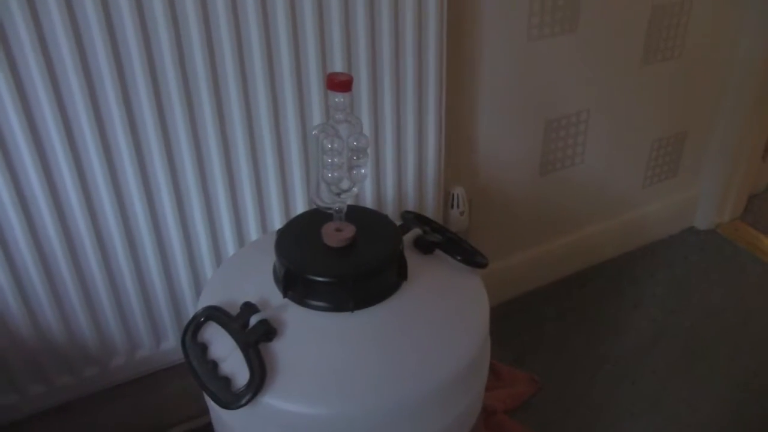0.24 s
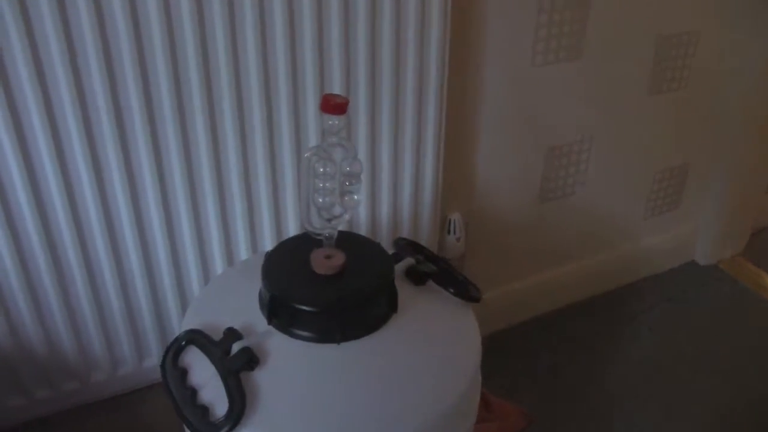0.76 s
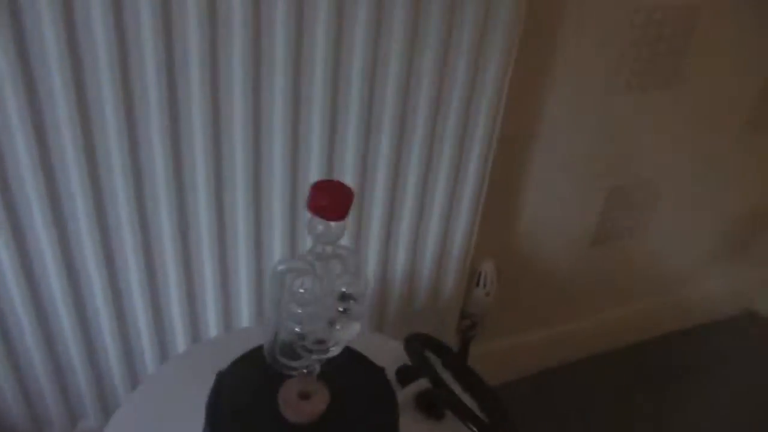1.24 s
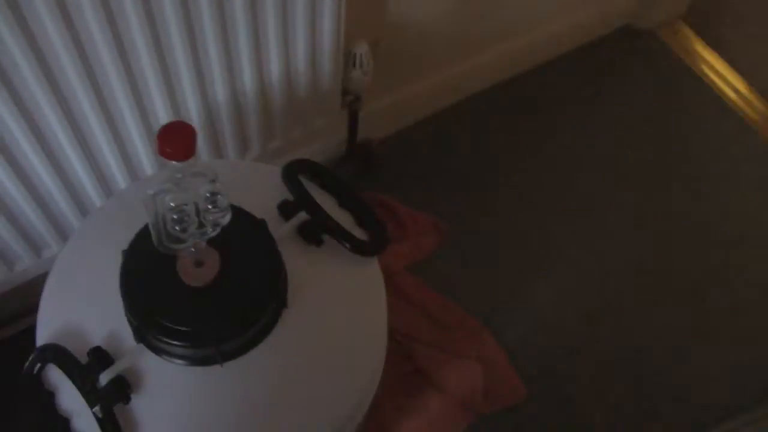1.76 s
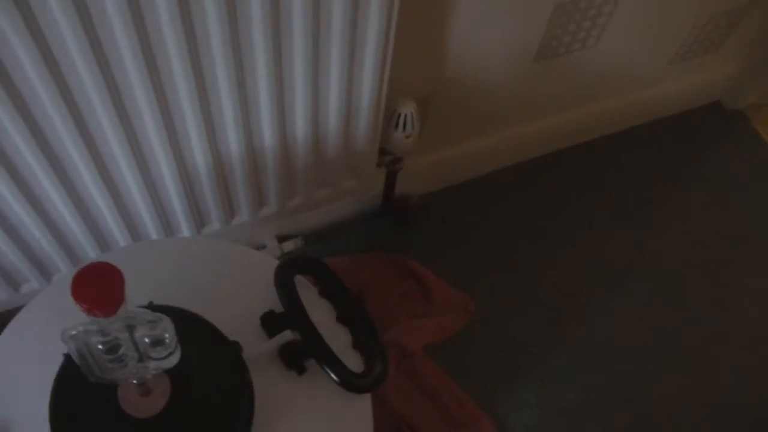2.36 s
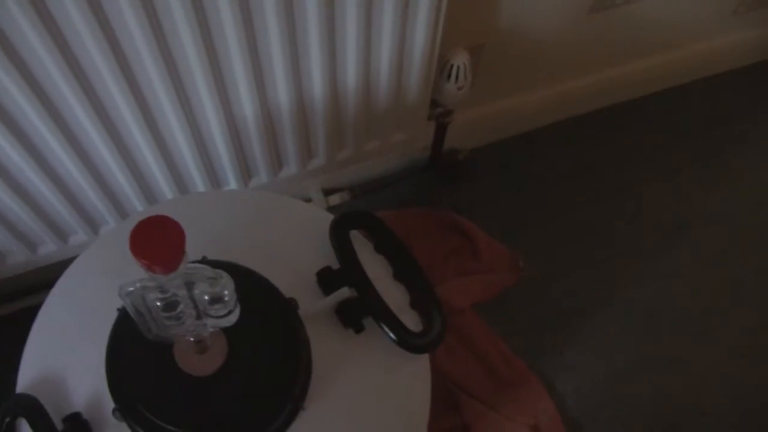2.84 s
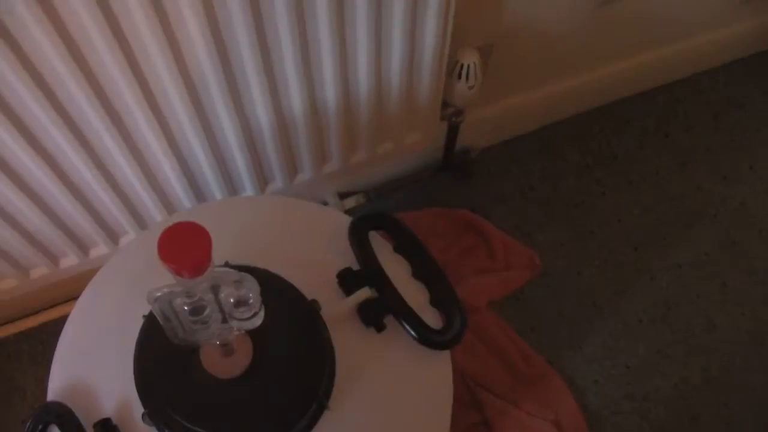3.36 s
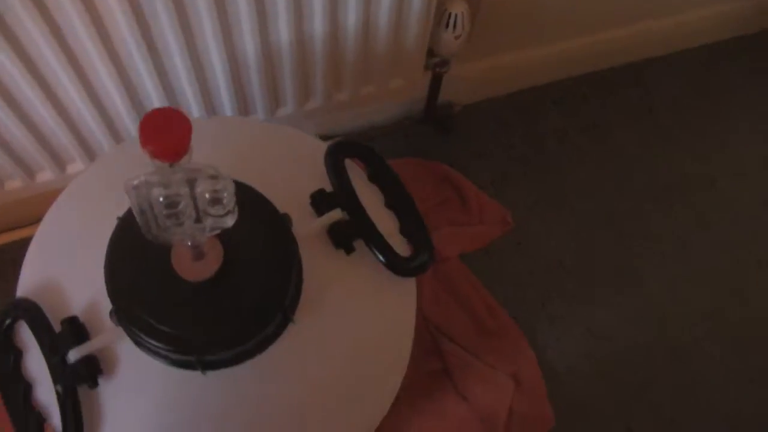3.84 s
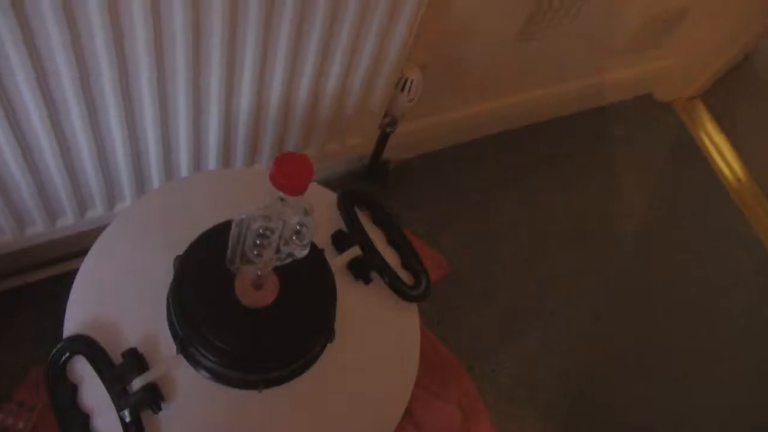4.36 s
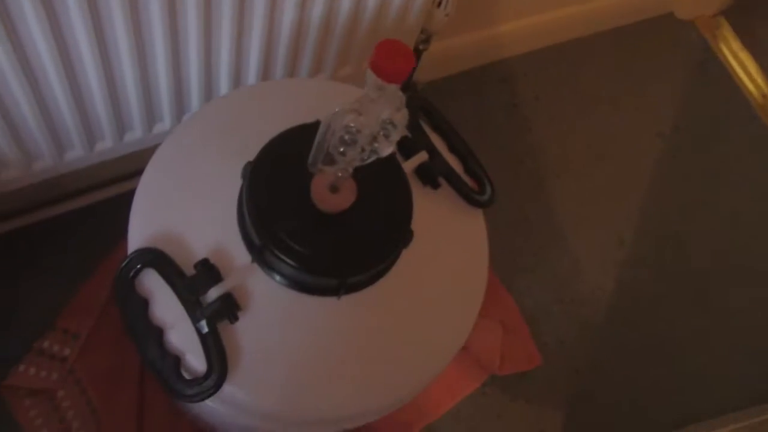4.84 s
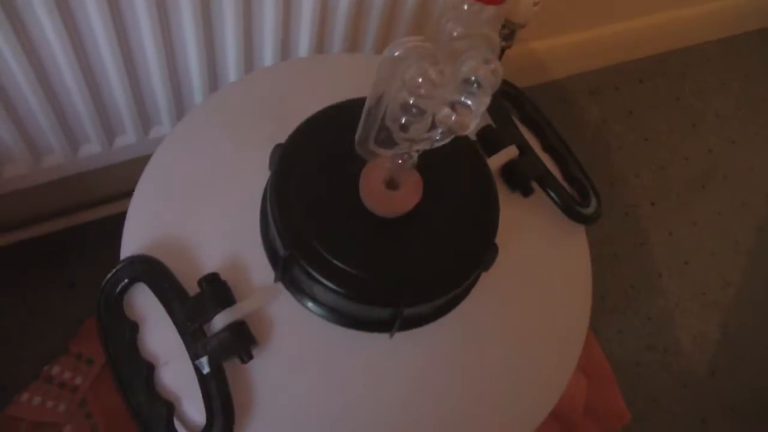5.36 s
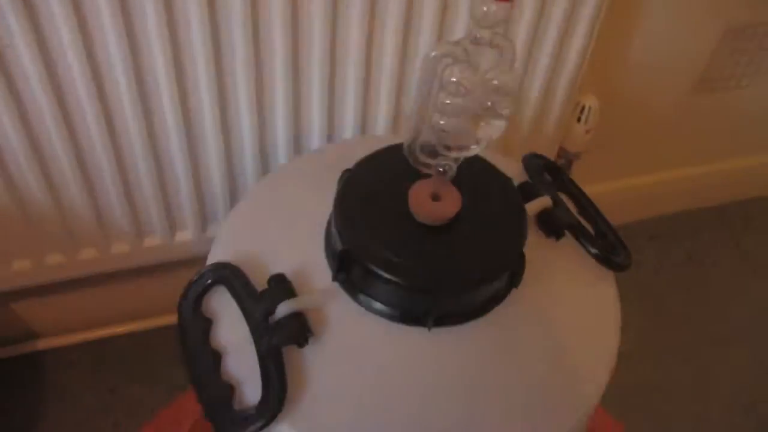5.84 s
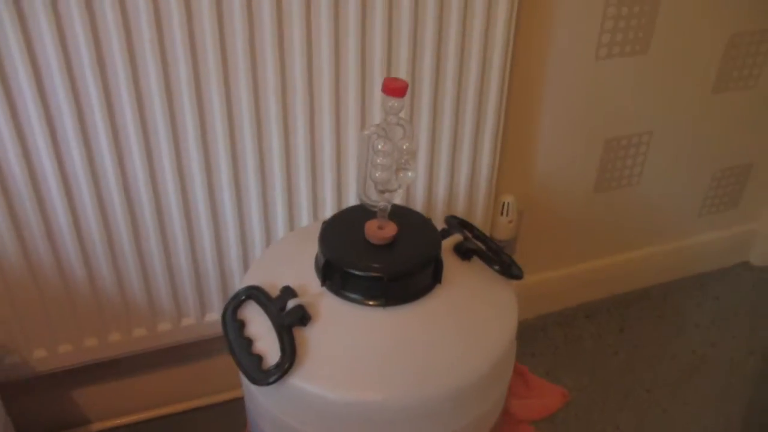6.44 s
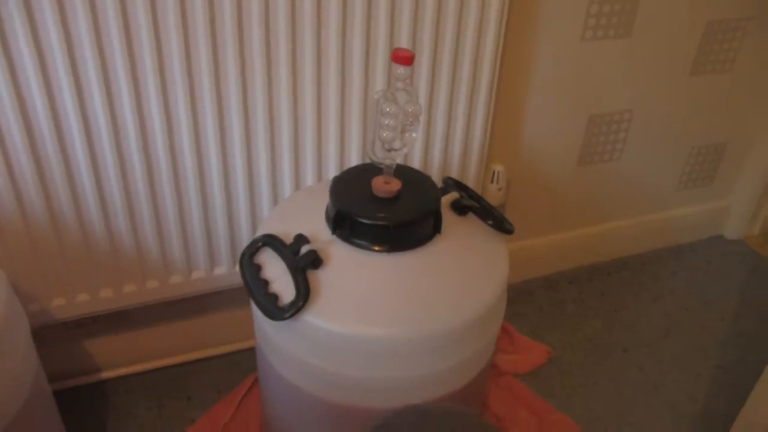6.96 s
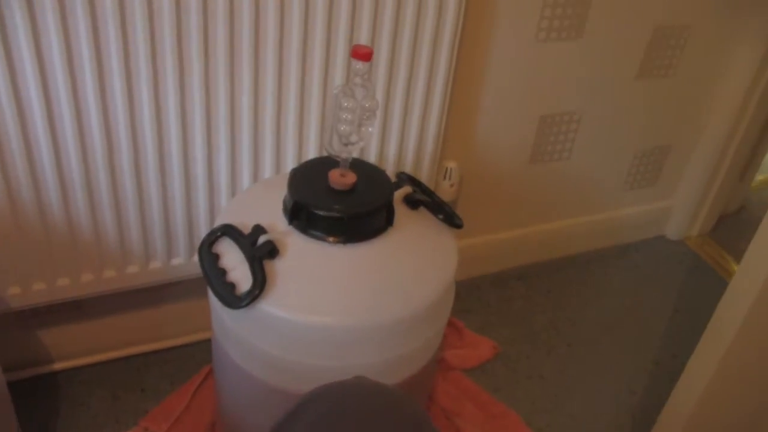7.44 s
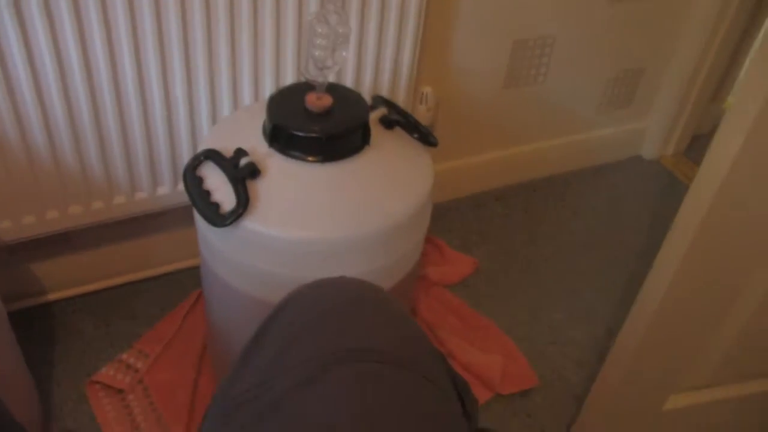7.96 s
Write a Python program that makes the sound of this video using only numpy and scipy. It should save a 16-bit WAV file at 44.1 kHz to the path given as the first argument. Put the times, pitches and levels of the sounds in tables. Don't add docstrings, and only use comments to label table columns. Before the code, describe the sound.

A quiet, small carpeted room with steady low air and soft microphone hiss, heard close in gentle stereo. From 0 to 2.3 s someone shifts nearby: cloth rubs, dry seam ticks, carpet crackle, a tiny high rubber squeak at 1.2 s, and a soft knee thud with hard clicks around 1.9 s. Movement sinks almost to stillness. At 3.3 s, after a barely audible warning click, a hollow plastic part lets go with a sharp, bright double-edged pop, by far the loudest sound, with quick echoes and a short room tail. Rustles, ticks and a low bump return at 3.9 to 4.9 s. At 5.4 to 5.65 s crisp clicks meet one brief airlock gurgle, bubbles ringing and climbing. Soft thuds follow at 5.7 s, then weight drags with dull stuttering creaks from 6.1 to 7.1 s, a knock at 7.35 s, and light rustling and faint creaks to the end, about 8 s.

```python
import sys
import numpy as np
from scipy import signal
from scipy.fft import rfft, irfft
from scipy.io import wavfile

SR = 44100
rng = np.random.default_rng(int(sys.argv[2]) if len(sys.argv) > 2 else 0)


def linear_from_db(decibels):
    return 10 ** (np.asarray(decibels, float) / 20)


def generate_wav(sig):
    pcm = np.round(np.clip(np.atleast_2d(sig).T, -1, 1) * 32767).astype(np.int16)
    wavfile.write(sys.argv[1], SR, pcm)


N = 361487
EDGES_HZ = 40 * 2 ** np.arange(0, 9, .5)


def rms_one(x):
    return x / np.sqrt(np.mean(x ** 2) + 1e-20)


def peak_one(x):
    return x / abs(x).max()


def at_hz(points, hz):
    points = np.array(sorted(points))
    return np.interp(np.log(hz), np.log(points[:, 0]), points[:, 1])


def drift(rate_hz):
    r = np.exp(-16 * np.pi * rate_hz / SR)
    slow = signal.lfilter([1], [1, -2 * r, r * r], rng.standard_normal(N // 8 + 4002))[4000:]
    return np.interp(np.arange(N) / 8, np.arange(len(slow)), rms_one(slow))


def band(x, low_hz, high_hz):
    sos = signal.butter(2, [low_hz, min(high_hz, .45 * SR)], "band", fs=SR, output="sos")
    return signal.sosfilt(sos, x)


def fading(t60_s, size):
    return linear_from_db(-60 * np.arange(size) / SR / max(t60_s, .002))


def ring(x, hz, t60_s):
    r = linear_from_db(-60 / (t60_s * SR))
    w = 2 * np.pi * hz / SR
    return signal.lfilter([0, np.sin(w)], [1, -2 * r * np.cos(w), r * r], x + 1e-18)


def add(out, start_s, x):
    i = round(start_s * SR)
    out[i:i + len(x)] += x[:N - i]


def room_tone():
    # frequency in Hz, density in dB per Hz.
    air = [(12, -36.5), (20, -5), (33, -27), (58, -16.5), (91, -14.5), (154, -22.5), (270, -21), (337, -24),
           (367, -22), (399, -23.5), (849, -33.5), (923, -30), (1190, -32.5), (3950, -34), (16000, -49)]
    # frequency in Hz, side minus mid in dB.
    air_side = [(60, -26), (110, -4.5), (200, 2), (380, 2), (700, 7), (1290, 3), (2380, -2), (4400, -5.5),
                (8120, 0), (15000, 2)]
    level_db = -68
    hz = np.maximum(np.arange(N // 2 + 1) * SR / N, 1)
    mid, side = rfft(rng.standard_normal((2, N))) * linear_from_db(at_hz(air, hz)) * (hz > 18)
    scale = linear_from_db(level_db) / np.std(irfft(mid, N))
    side = side * linear_from_db(at_hz(air_side, hz))
    return scale * irfft(np.array([mid + side, mid - side]), N)


def effort(t_s):
    # time in seconds, steady rustle in dB.
    restless = [(0.0, -65.5), (0.35, -68), (0.45, -70), (0.85, -65), (1.1, -63), (1.5, -62.5),
                (1.85, -62.5), (2.25, -68), (2.8, -70.5), (3.18, -72.5), (3.8, -71.5), (4.3, -67.5),
                (5.4, -65), (5.55, -61.5), (7.08, -61.5), (7.18, -67), (7.5, -68), (8.2, -73.5)]
    steady_db = [-10, 0, 0, -2.5]
    # peak time in seconds, level in dB, fading time in seconds, hiss over rub in dB.
    rubs = [(.038, -62, 0.022, -16), (.59, -59.5, 0.058, -4.5), (.66, -56, 0.081, -1.8),
            (.954, -61, 0.074, -2), (1.213, -57.5, 0.087, -2.5), (1.33, -59.5, 0.069, -12),
            (1.706, -62, 0.16, -3), (1.896, -49.5, 0.03, -4), (1.96, -62.5, 0.2, -1.5),
            (2.359, -65, .08, -3), (2.658, -68, .08, -5), (3.891, -60.5, 0.05, -4.5),
            (3.956, -56, 0.037, -6), (4.083, -57.5, 0.046, -5.5), (4.406, -61, 0.02, 2.5),
            (4.49, -60, 0.044, -2.5), (4.69, -65, 0.15, 2), (4.867, -62.5, 0.051, -8),
            (5.068, -65.5, 0.047, 1), (5.29, -75, 0.11, -3), (5.388, -56, 0.028, -3.5),
            (5.69, -62, 0.035, -13), (5.77, -59.5, 0.13, -1), (5.899, -58.5, 0.048, -8),
            (6.08, -62, 0.086, -25), (6.48, -65, 0.24, 4.5), (6.9, -62.5, 0.23, 4),
            (7.357, -65, 0.06, -1.5), (7.69, -66, 0.2, -2), (8.015, -60.5, 0.045, -5),
            (.79, -66.5, 0.075, 3.5), (7.6, -74, .08, -4), (7.93, -70, 0.13, 1)]
    # peak time in seconds, level in dB, fading time in seconds,
    # floor rumble over drag in dB.
    shifts = [(0.0, -63, 0.26, -8), (.3, -65, 0.15, -20), (.954, -52.5, 0.056, -17), (1.23, -58, 0.19, -12),
              (1.39, -68, 0.045, -4), (1.7, -61, 0.075, -29), (1.896, -50, 0.033, -16),
              (1.96, -55.5, 0.093, -16), (2.3, -66.5, 0.15, -3), (2.506, -73, 0.044, 6),
              (2.83, -83, .06, 7), (3.56, -69, 0.19, -13), (4.406, -53.5, 0.022, -30),
              (4.49, -67, 0.052, -25), (4.63, -81, 0.069, .5), (4.867, -59, 0.043, -1),
              (5.14, -69, 0.095, -16), (5.344, -65, 0.035, -18), (5.55, -53.5, 0.12, -7),
              (5.72, -53, 0.14, 0), (5.9, -59, 0.17, -22), (6.18, -50.5, 0.12, -33),
              (6.467, -55.5, 0.31, -11), (6.7, -57, 0.34, -6), (6.85, -58, 0.36, -19),
              (7.09, -56, 0.061, -13), (7.29, -60, 0.12, -11), (7.485, -64.5, 1, -10),
              (7.916, -60, 0.076, -9), (8.1, -67, 0.24, -3)]
    rise_share, fade_db, rounding = 0.79, 9.5, 1.5
    power = linear_from_db(2 * (np.interp(t_s, *np.transpose(restless)) + np.c_[steady_db]))
    moves = [(at, db, fade_s, [-31, -7, 0, hiss_db]) for at, db, fade_s, hiss_db in rubs]
    moves += [(at, db, fade_s, [rumble_db, 0, -20, -35]) for at, db, fade_s, rumble_db in shifts]
    for at, db, fade_s, colour_db in moves:
        away = np.where(t_s > at, t_s - at, (at - t_s) / rise_share) / fade_s
        power = power + linear_from_db(2 * (db - fade_db * away ** rounding + np.c_[colour_db]))
    return 10 * np.log10(power)


def moving(patchy_db, grain_db, side_db):
    moving_hz = [100, 520, 2400, 4300, 6100]
    # frequency in Hz, level in dB.
    cloth = [(40, -10.5), (70, -15.5), (150, -3), (210, -4.5), (300, -5.5), (430, -9), (760, -7.5),
             (1500, -5.5), (3000, -5), (4300, -7), (6000, -1.5), (8600, -5.5), (12000, -6), (15000, -7.5)]
    # frequency in Hz, flicker in dB.
    lumps = [(60, -1.5), (250, 2), (700, 2), (1500, 2), (8000, -0.96)]
    t_s = np.arange(0, N + 128, 128) / SR
    levels_db = effort(t_s)[[0, 1, 2, 2, 3]]
    white = rng.standard_normal((2, 2, N)) * linear_from_db(grain_db * drift(350))
    out, together = 0, drift(25.3)
    for k, (low_hz, high_hz) in enumerate(zip(EDGES_HZ, EDGES_HZ[1:])):
        hz = np.sqrt(low_hz * high_hz)
        shares = np.array([np.interp(np.log(hz), np.log(moving_hz), one) for one in np.eye(len(levels_db))])
        level_db = np.interp(np.arange(N) / SR, t_s, shares @ levels_db)
        flicker_db = patchy_db * min(hz / 600, 1) * together + at_hz(lumps, hz) * drift(21)
        noise = rms_one(band(white[k % 2], low_hz, high_hz))
        mid, side = noise * linear_from_db(level_db + at_hz(cloth, hz) + flicker_db)
        out = out + mid + linear_from_db(side_db) * side * [[1], [-1]]
    return out


def crackle():
    creaks_per_s, level_db, cycles = 160, -13, 4.5
    t_s = np.arange(0, N + 128, 128) / SR
    sizes = linear_from_db(3.9 * np.minimum(rng.exponential(1, N), 2.4)) * rng.choice([-1, 1], N)
    sizes = sizes * (rng.random(N) < creaks_per_s / SR)
    pitches_hz = np.geomspace(300, 2600, 14)
    dealt = rng.integers(0, 14, N)
    rings = sum(ring(sizes * (dealt == k), hz, cycles / hz) for k, hz in enumerate(pitches_hz))
    drag_db = np.interp(np.arange(N) / SR, t_s, effort(t_s)[1])
    return rms_one(rings) * linear_from_db(drag_db + level_db)


def squeak(partial_db):
    # time in seconds, pitch in Hz, level in dB.
    sole = [(1.18, 2900, -62), (1.192, 3000, -55), (1.202, 2880, -57), (1.207, 2940, -39.5),
            (1.218, 2970, -44.5), (1.222, 3050, -56), (1.232, 2990, -57), (1.244, 3000, -66)]
    t = np.arange(N) / SR
    s, hz, db = np.transpose(sole)
    phase = 2 * np.pi * np.cumsum(np.interp(t, s, hz) * (1 + 0.0323 * drift(270))) / SR
    level = linear_from_db(np.interp(t, s, db) + 1.7 * drift(120) + 2.0) * (t > s[0]) * (t < s[-1])
    return level * (np.sin(phase) + linear_from_db(partial_db) * np.sin(1.88 * phase) + linear_from_db(-16) * np.sin(4.7 * phase))


def ticks():
    # start in seconds, level in dB, brightness in dB, ring in Hz.
    casing = [(.023, -54, -2, 1100), (1.123, -50, 3, 2420), (1.18, -55, -1, 2920), (1.891, -46, 1, 930),
              (3.904, -52, -6, 1600), (4.061, -57, 4, 3690), (4.435, -50.5, -7, 1620),
              (4.467, -53.5, -8, 860), (4.518, -63, -11.5, 3340), (4.564, -52.5, -1, 4000),
              (5.533, -56, -2, 2000), (5.652, -56, 1.5, 1800), (5.690, -52, 4, 2190),
              (5.743, -48.5, -1, 1800), (7.042, -56, -6, 1300), (7.349, -50.5, -12, 3800)]
    seams = [(0.317, -57, 9.5, 1400), (.495, -58.5, -4, 920), (.574, -55, 7, 1690), (.934, -48.5, 4, 2150),
             (1.001, -49, 0.5, 1510), (1.334, -56.5, -12, 945), (1.787, -49, -2, 1190),
             (1.879, -45, 0, 1210), (1.982, -49, 0.5, 814), (2.207, -45, 1.5, 1880), (2.598, -56, 0, 900),
             (2.649, -54.5, -2.5, 1650), (3.882, -48.5, 2, 2140), (3.953, -41, 3, 1660),
             (4.009, -62, 6, 1400), (4.182, -59, 4, 2850), (4.334, -55.5, 4, 880),
             (4.863, -50.5, -5.5, 1270), (4.887, -65, 6, 1180), (5.382, -44.5, 7, 2060),
             (5.504, -45, 5.5, 5700), (5.547, -51, -4, 3120), (6.342, -48.5, -8, 790),
             (6.735, -51.5, -6.5, 790), (6.979, -48.5, -8, 665), (7.51, -66, -14.5, 816),
             (7.793, -55, -6.5, 1380)]
    boards = [(1.412, -50, 1, 764), (2.776, -55.5, 1.5, 1040), (2.897, -55.5, 4, 1110),
              (4.103, -53, -4, 1970), (4.391, -44.5, -4, 1580), (5.958, -52, -3, 840),
              (6.17, -57, -14, 830), (6.185, -55, -10, 660), (6.452, -58, -4.5, 730),
              (7.085, -60.5, -17, 694), (7.373, -59.5, -9, 690), (7.723, -53.5, -2.5, 1370),
              (8.051, -60, -12, 960)]
    # low edge in Hz, high edge in Hz.
    tick_bands = [(620, 2400), (1700, 5900), (4300, 12500)]
    kinds = [(casing, 7.5, 0.027), (seams, 1.4, 0.034), (boards, -1.5, 0.028)]   # rows, middle dB, t60 s
    first_touch, ring_cycles, ring_share, size = 5.0, 10, 0.3, 3000
    out = np.zeros(N)
    for rows, middle_db, t60_s in kinds:
        for s, db, bright_db, hz in rows:
            contact = rng.standard_normal(size)
            contact[0] += first_touch
            snap = signal.lfilter([1], [1, -.4], contact) * fading(t60_s, size)
            snap = peak_one(snap) + peak_one(ring(snap, hz, ring_cycles / hz)) * ring_share
            part_db = [db - bright_db, db + middle_db, db + bright_db]
            for level_db, edges in zip(part_db, tick_bands):
                add(out, s, linear_from_db(level_db) * peak_one(band(band(snap, *edges), *edges)))
    return out


def swings(rows):
    out, size = np.zeros(N), 9000
    t = np.arange(size) / SR
    for s, db, hz, t60_s in rows:
        onset = 1 - np.exp(-3.0 * t * abs(hz))
        add(out, s, linear_from_db(db) * onset * fading(t60_s, size) * np.sin(2 * np.pi * hz * t))
    return out


def thuds():
    # start in seconds, peak in dB, frequency in Hz, t60 in seconds.
    thud_rows = [(1.389, -51.5, 75, 0.13), (1.87, -43.5, 335, 0.1), (1.9, -43.5, 140, 0.097),
                 (3.333, -54, 109, 0.07), (4.092, -37, 124, 0.026), (5.69, -42, 229, 0.089),
                 (5.716, -45.5, 104, 0.12), (5.734, -45.5, 70.4, 0.28), (6.138, -46, 780, 0.049),
                 (6.731, -42.5, 473, 0.027), (7.915, -48, 390, 0.052), (4.521, -59, 140, 0.44),
                 (4.73, -56.5, 152, 0.25), (4.92, -47, 72, 0.13), (5.121, -60, 155, 0.13),
                 (5.2, -58, 154, 0.22), (5.965, -55, 64.4, 0.19), (5.44, -49, 130, 0.096),
                 (2.0, -52, 75, .2), (2.2, -60, 87, 0.32), (6.64, -56, 210, .15), (3.334, -53, 188, .1),
                 (1.3, -55, 80, .15)]
    return swings(thud_rows)


def knocks():
    # start in seconds, peak in dB, frequency in Hz, t60 in seconds.
    knock_rows = [(0.46, -46, 1250, .015), (1.872, -37, 520, .015), (1.879, -48, 1150, .015),
                  (1.893, -37, 1510, .02), (1.894, -46, 2080, 0.017), (1.984, -44, 990, 0.017),
                  (1.984, -42.5, 1650, .015), (1.992, -44, 790, .02), (3.296, -46, 1860, .03),
                  (3.296, -51.5, 3590, 0.022), (3.297, -58, 3100, .03), (3.297, -56, 4800, .03),
                  (3.306, -53, 1880, .03), (5.5043, -30, 5500, .008), (5.5047, -38, 7000, 0.0036),
                  (5.5059, -30.5, 5730, .009), (5.5058, -42, 3900, .012), (5.508, -41, 4900, 0.0073),
                  (5.505, -42, 7060, .012), (5.512, -46, 5900, 0.025), (5.534, -40.5, 1920, 0.026),
                  (5.537, -47, 3000, 0.022), (5.546, -47, 2950, 0.018), (7.349, -39, 865, 0.024),
                  (7.35, -46, 1220, 0.018), (7.35, -41.5, 1600, 0.033), (7.35, -46, 2040, .02),
                  (7.349, -48, 3200, .01), (7.372, -50, 1400, .03), (7.042, -34.5, 1270, .005),
                  (7.042, -44, 2900, .003), (5.6902, -28, 4300, .002), (4.392, -36, 1370, .006),
                  (4.438, -42, 2700, .008), (4.4677, -39, 1900, .005), (4.388, -50, 2200, .008),
                  (4.406, -45, 800, .006), (4.2, -42, 3200, .002), (2, -37, 1000, .004),
                  (1.8935, -36, 3000, .002), (1.907, -34, 2000, .003), (6.984, -40, 2600, .004),
                  (7.085, -47, 2060, .008), (6.992, -46, 2400, .006), (.851, -50, 9000, .002),
                  (.598, -52, 6000, .006), (.675, -48, 6000, .006), (6.342, -45, 1400, .008),
                  (6.981, -46, 2600, .006),
                  (.29, -50, 900, .008), (.634, -48, 1100, .006), (.76, -52, 900, .01),
                 (.912, -50, 600, .01), (.495, -49, 3000, .003), (.023, -47, 3000, .003),
                 (2.207, -40, 2500, .003), (6.343, -42, 2500, .003), (1.901, -37, 1900, .005),
                 (1.887, -41, 1200, .006)]
    return swings(knock_rows)


def jerks():
    # start in seconds, peak in dB, frequency in Hz.
    jerk_rows = [(6.167, -41, 470), (6.19, -43, 480), (6.226, -43, 420), (6.268, -45, 730),
                 (6.29, -44, 724), (6.299, -45, 400), (6.365, -43, 340), (6.385, -39, 320),
                 (6.405, -41, 330), (6.425, -39, 320), (6.449, -43, 400), (6.493, -43, 280),
                 (6.516, -43, 500), (6.541, -47, 330), (6.594, -44, 600), (6.629, -44, 450),
                 (6.749, -42, 700), (6.762, -42, 720), (6.776, -42, 650), (6.827, -46, 680),
                 (6.918, -46, 560), (7.069, -44, 720), (7.089, -44, 690), (7.893, -49, 480),
                 (7.928, -49, 480), (7.936, -49, 330), (8.051, -46, 960), (7.1, -45, 600),
                 (7.006, -44, 700), (6.99, -47, 400)]
    return swings([(s, db + 5.0, -hz, 3.0 / hz) for s, db, hz in jerk_rows])


def bubbles():
    # start in seconds, peak in dB, first pitch in Hz, last pitch in Hz, swell in seconds.
    bubble_rows = [(5.44, -41, 530, 560, 0.004), (5.442, -51, 1010, 950, .002),
                   (5.462, -47, 255, 340, 0.0066), (6.6, -48, 180, 214, 0.004),
                   (5.448, -47, 540, 580, 0.006), (5.547, -32, 714, 770, 0.0052),
                   (5.546, -42, 510, 510, 0.0027), (5.555, -44, 270, 285, 0.006),
                   (5.565, -52, 840, 720, 0.0054), (5.591, -38, 970, 900, 0.0047),
                   (5.596, -38.5, 930, 800, 0.006), (5.590, -39, 526, 480, 0.007),
                   (5.604, -51, 1010, 1130, 0.0032), (5.636, -47, 1000, 990, .003),
                   (5.546, -48, 1150, 1070, .003), (5.598, -47, 330, 290, 0.0041),
                   (5.620, -50, 840, 930, 0.016), (5.563, -47, 790, 740, .012),
                   (5.640, -51, 755, 760, 0.0059)]
    base_t60_s, small_dies, strong_dies = 0.031, .45, 0.025
    out, t = np.zeros(N), np.arange(6000) / SR
    for s, db, first_hz, last_hz, swell_s in bubble_rows:
        hz = last_hz + (first_hz - last_hz) * np.exp(-t / (0.61 * swell_s + 0.0083))
        t60_s = base_t60_s * (700 / last_hz) ** small_dies * np.exp(-strong_dies * (db + 35))
        swell = np.sin(np.pi / 2 * np.minimum(t / swell_s, 1)) ** 2
        shape = swell * linear_from_db(-60 * np.maximum(t - swell_s, 0) / t60_s)
        add(out, s, linear_from_db(db) * shape * np.sin(2 * np.pi * np.cumsum(hz) / SR))
    return out


def glides():
    # time in seconds, pitch in Hz, rms level in dB.
    long_bubbles = [
        [(5.465, 393, -61), (5.471, 407, -59), (5.483, 539, -46.5), (5.491, 660, -44.5), (5.505, 725, -48),
         (5.522, 727, -62)],
        [(5.515, 415, -68), (5.521, 438, -55), (5.531, 516, -49), (5.548, 522, -52)],
    ]
    partial_db, gain_db = -18, 0.5
    out, t = np.zeros(N), np.arange(N) / SR
    for rows in long_bubbles:
        s, hz, db = np.transpose(rows)
        now = t[(t > s[0]) & (t < s[-1])]
        phase = 2 * np.pi * np.cumsum(np.interp(now, s, hz)) / SR
        ends = np.minimum(np.minimum(now - s[0], s[-1] - now) / 0.0027, 1)
        wobble_db = 1.5 * np.sin(2 * np.pi * 90.0 * (now - s[0]))
        level = linear_from_db(np.interp(now, s, db) + 3.5 + gain_db + wobble_db)
        add(out, s[0], ends * level * (np.sin(phase) + linear_from_db(partial_db) * np.cos(2 * phase)))
    return out


def pop():
    # time in seconds, hollow body in dB, bright crack in dB.
    slips = [
        (3.2952, -43, -53),
        (3.3045, -42, -53),
        (3.3274, -16.5, -27),
        (3.3296, -58.5, -13),
        (3.3308, -59.5, -9),
        (3.3318, -62, -14.5),
        (3.3334, -63.5, -15),
        (3.334, -63, -14.5),
        (3.3354, -15.5, -21),
        (3.340, -64, -23.5),
    ]
    # frequency in Hz, level in dB, t60 in seconds.
    shell_modes = [(935, 1.2, .0115), (1170, -10, .012), (1455, -17, 0.01), (1860, -10, 0.01),
                   (2460, -14, .008), (3000, -20, .008)]
    # frequency in Hz, level in dB, t60 in seconds.
    crack_modes = [(2500, -10, 0.0022), (2850, -22, 0.0023), (4040, -23, 0.0024), (4670, -7, 0.004),
                   (5250, -9, 0.0044), (6430, -12, .002), (7340, -13.5, 0.003), (8900, -10, 0.0027),
                   (10000, -26.5, .003)]
    start_s, size = 3.29, 12000
    crack_t60_s, crack_rise_s, flat_db = 0.0064, .0004, -11
    shell_low_hz, bass_db = 860, -15
    s, body_db, crack_db = np.transpose(slips)
    at = np.round((s - start_s) * SR).astype(int)

    shell = np.zeros(size)
    for hz, db, t60_s in shell_modes:
        clicks = np.zeros(size)
        clicks[at] = linear_from_db(body_db + db + rng.normal(0, 0.78, len(at)))
        swell = 2 * np.e * np.log(1000) / (t60_s * SR)
        shell += swell * ring(ring(clicks, hz, t60_s), hz, t60_s)
    thin = signal.butter(5, shell_low_hz, "high", fs=SR, output="sos")

    cracks = np.zeros(size)
    cracks[at] = linear_from_db(crack_db)
    burst = fading(crack_t60_s, 2000) * np.minimum(np.arange(2000) / SR / crack_rise_s, 1)
    cracks = np.convolve(cracks, burst)[:size] * rng.standard_normal(size)
    bright = sum(linear_from_db(db - 8.5) * ring(cracks, hz, t60_s) for hz, db, t60_s in crack_modes)
    bright = bright + linear_from_db(flat_db) * band(band(cracks, 1900, 12000), 1500, 13000)
    push = linear_from_db(bass_db) * band(cracks, 170, 480)

    out = np.zeros((2, N))
    add(out[0], start_s, signal.sosfilt(thin, shell))
    add(out[1], start_s, signal.sosfilt(thin, bright) + push)
    return out


def echoes():
    # start in seconds, peak in dB, frequency in Hz.
    echo_rows = [(3.349, -30, 960), (3.362, -33, 1010), (3.376, -39, 1190), (3.380, -39, 940),
                 (3.396, -41, 930), (3.411, -45, 950), (3.444, -57, 960)]
    t60_s = .019
    out, t = np.zeros(N), np.arange(3000) / SR
    swing = t * np.log(1000) / t60_s
    for s, db, hz in echo_rows:
        add(out, s, linear_from_db(db) * np.e * swing * np.exp(-swing) * np.sin(2 * np.pi * hz * t))
    return out


def pop_in_room(snap):
    # frequency in Hz, density in dB per Hz.
    pop_tail = [(300, -20), (520, -15), (760, -16), (1000, -7), (1740, -14), (2500, -9), (3600, -12),
                (4500, -6), (5500, -9), (8000, -13), (15000, -26)]
    tail_db, warning_db = 0.3, -31
    out, size = np.zeros(N), 2048
    hz = np.maximum(np.arange(size // 2 + 1) * SR / size, 1)
    click = np.roll(irfft(linear_from_db(at_hz(pop_tail, hz)), size), 100)[:400]
    click = click * linear_from_db(tail_db) * np.sqrt(np.sum(snap ** 2) / np.sum(click ** 2))
    add(out, 3.330, click)
    add(out, 3.294, click * linear_from_db(warning_db))
    return out


def room(x):
    # frequency in Hz, t60 in seconds.
    room_t60 = [(100, 0.27), (1000, 0.22), (2500, 0.21), (3600, .19), (4600, 0.24), (6500, .19),
                (8000, 0.19), (15000, 0.19)]
    # frequency in Hz, side minus mid in dB.
    room_side = [(300, -14), (2000, -18), (5000, -13), (12000, -6)]
    level_db, size = -6.5, 16000
    white, tail = rng.standard_normal((2, 2, size)), 0
    for k, (low_hz, high_hz) in enumerate(zip(EDGES_HZ, EDGES_HZ[1:])):
        hz = np.sqrt(low_hz * high_hz)
        dying = band(white[1 - k % 2], low_hz, high_hz) * fading(at_hz(room_t60, hz), size)
        tail = tail + dying * [[1], [linear_from_db(at_hz(room_side, hz))]]
    tail = tail * np.minimum(np.arange(size) / SR / 0.0082, 1)
    tail = tail / np.sqrt(np.sum(tail[0] ** 2))
    mid, side = signal.fftconvolve(x[None], tail, axes=1)[:, :N]
    return linear_from_db(level_db) * (mid + side * [[1], [-1]])


def scene():
    close_db, water_db = -4, -7
    body = moving(patchy_db=0.7, grain_db=1.0, side_db=-18.5) + crackle()
    close = squeak(partial_db=-17) + ticks() + thuds() + knocks() + jerks()
    water = bubbles() + glides()
    shell, snap = pop()
    wet = room(pop_in_room(snap) + linear_from_db(water_db) * water + linear_from_db(close_db) * close)
    events = shell + echoes() + snap + water + close + wet
    return events * linear_from_db([[-.45], [.45]]) + room_tone() + body * linear_from_db([[-.2], [.2]])


def top_cut(x):
    return signal.sosfilt(signal.butter(12, 16450, fs=SR, output="sos"), x)


def record(dry):
    top_hz, offset = 15900, .0022
    low_pass = signal.ellip(8, .3, 45, top_hz * .995, fs=SR, output="sos")
    return top_cut(signal.sosfilt(low_pass, dry) + offset)


dry = scene()
out = record(dry)
generate_wav(out)
```